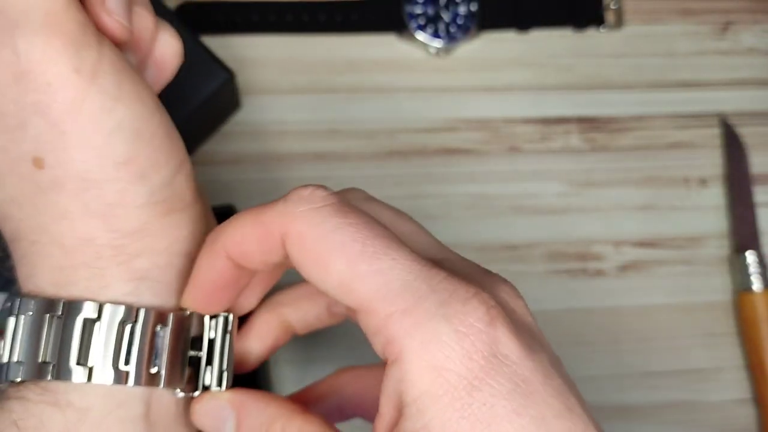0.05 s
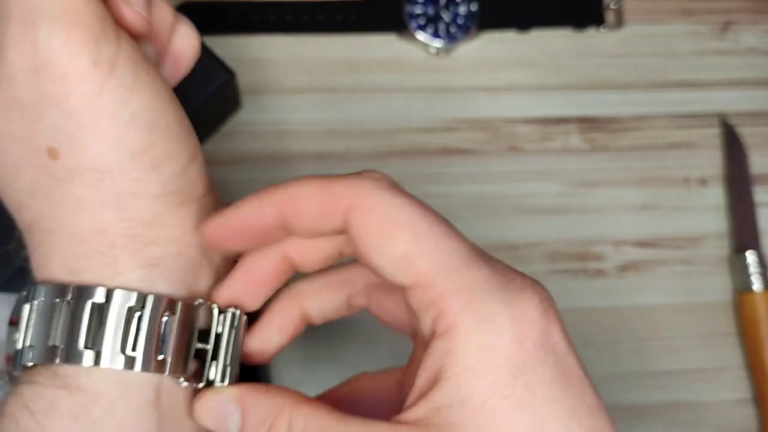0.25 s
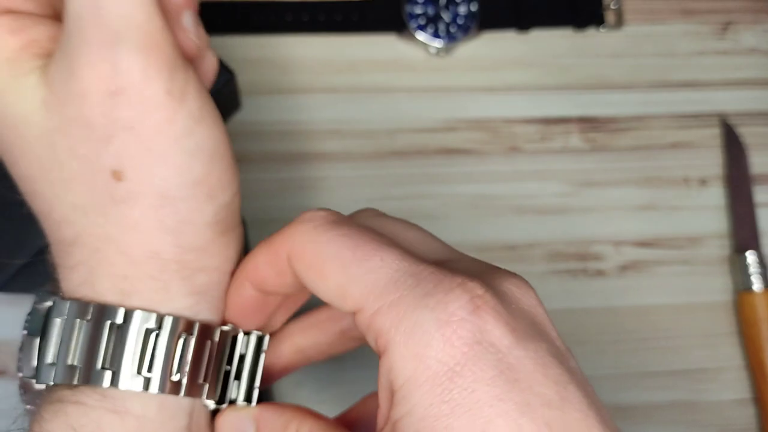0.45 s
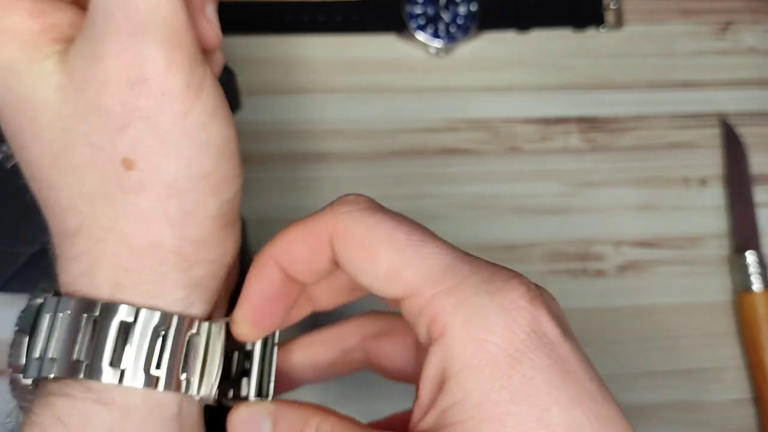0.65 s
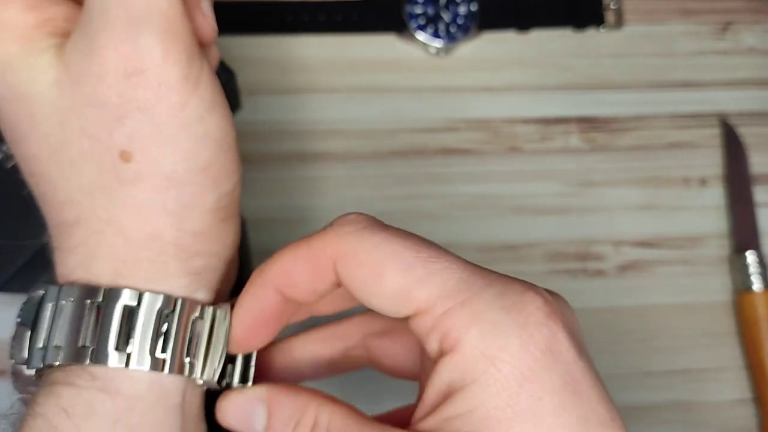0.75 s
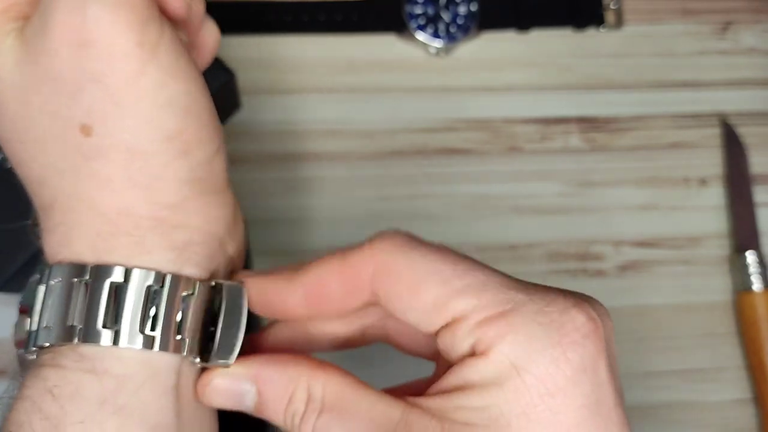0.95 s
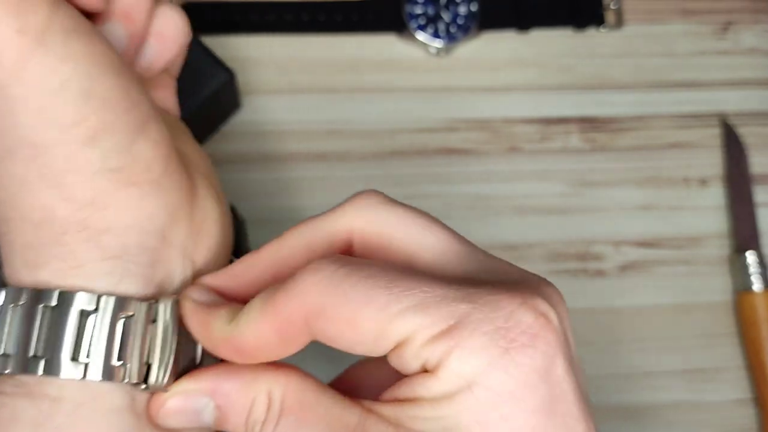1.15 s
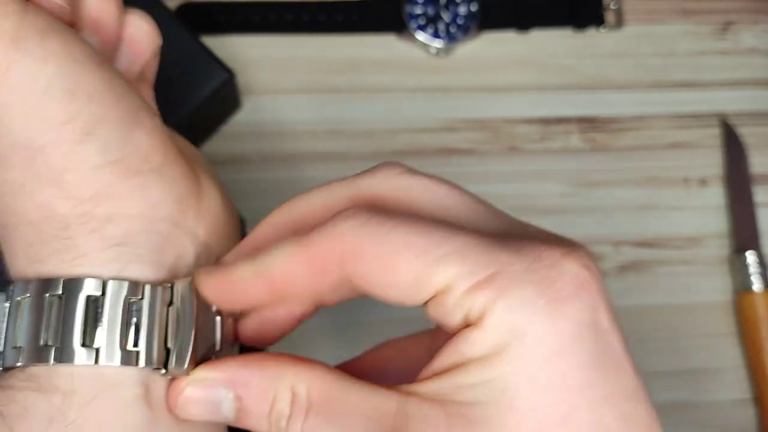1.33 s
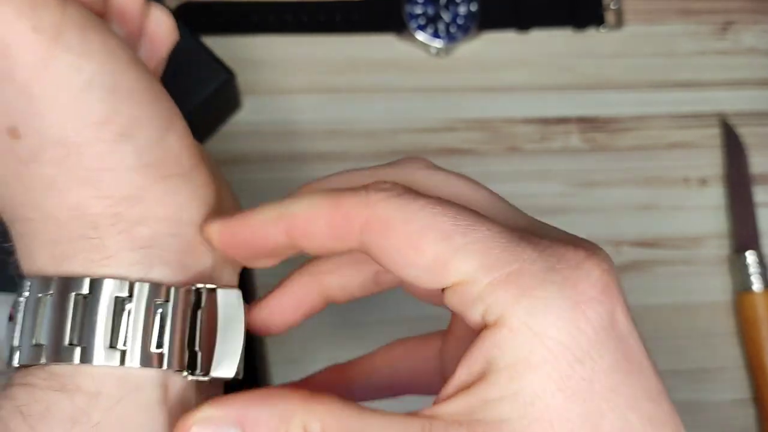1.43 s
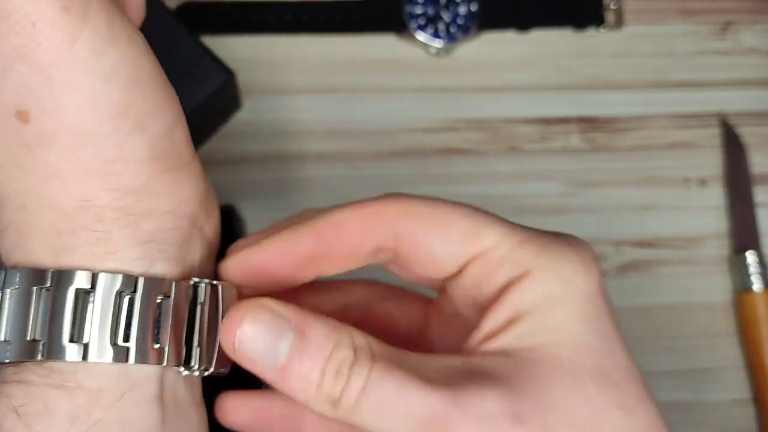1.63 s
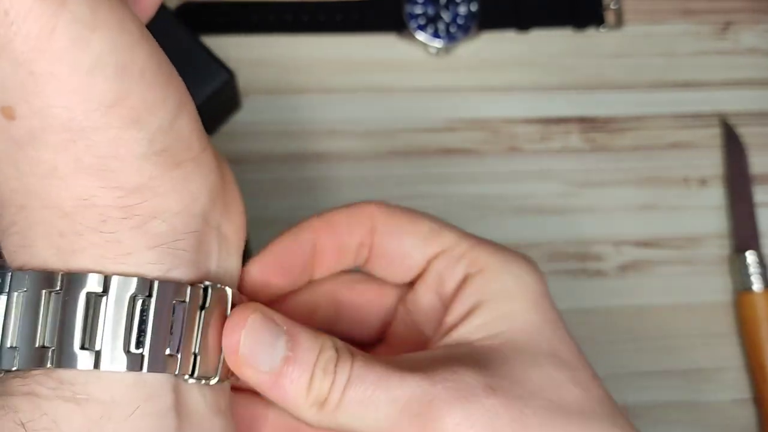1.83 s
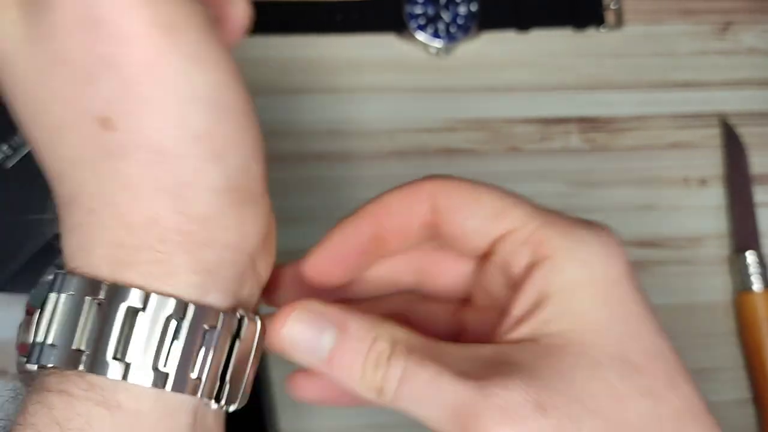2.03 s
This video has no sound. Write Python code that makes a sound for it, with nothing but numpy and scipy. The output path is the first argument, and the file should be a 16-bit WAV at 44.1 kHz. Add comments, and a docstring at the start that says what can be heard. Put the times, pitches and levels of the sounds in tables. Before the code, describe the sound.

A steel watch bracelet ticks and snaps shut in three bright metallic clicks, close in a quiet room

```python
"""Small quiet room: a steel watch bracelet is closed round a wrist, close to a pair of microphones.
Links tick as clusters of touches ring damped steel modes; rubs are dense grains, clear notes single modes.
The clasp snaps three times, with dull pushes on the wrist made as heavily damped swings, the strongest
at the last snap. Steel sounds return from the walls by convolution with decaying noise. Shaped noise
gives the dying tail of an earlier knock and a soft room hum and hiss."""
import sys
import numpy as np
from scipy import signal
from scipy.io import wavfile
from scipy.ndimage import uniform_filter1d

SR = 44100
rng = np.random.default_rng(int(sys.argv[2]) if len(sys.argv) > 2 else 0)


def inscribe(sig):
    """Save sig as 16-bit PCM at rate SR to the path in sys.argv[1].

    A 1-D sig is mono; a 2-D sig holds one channel per row.
    Samples are clipped to [-1, 1] before scaling.
    """
    pcm = np.round(np.clip(np.atleast_2d(sig).T, -1, 1) * 32767)
    wavfile.write(sys.argv[1], SR, pcm.astype(np.int16))


N = 92036

# Spreads from mode to mode and touch to touch; fade towards the ends of a cluster
DETUNE, STRENGTH_SPREAD_DB, TOUCH_SPREAD_DB, TOUCH_FADE_DB = .012, 2.5, 3, 6
CRACK_DB, CRACK_S = -7, 0.00029   # broadband edge of a touch against the ring's peak; 1/e decay time
LEAD_DB, AFTER_DB = -11.5, -14.5   # small touches before and after the main one, ahead of brightening
ROOM_RING = 0.34   # the steel's ring beside a unit impulse, in what goes out to the walls
PUSH_CYCLES, PUSH_LOW_HZ = 0.45, 82.5
RUB_GRAINS_PER_S, RUB_SPREAD_DB, RUB_OCTAVES = 2500, 4, 3.2
LEFT_LEAD_S = .00025
ECHO_S, ECHO_SPREAD_S, ECHO_DB = 0.01, 0.0014, -18   # early echoes: centre, width, energy
ROOM_DB, ROOM_RISE_S = -14.5, 0.037   # diffuse tail: energy, length of the ramp that ends at ECHO_S
KNOCK_DB, KNOCK_FLICKER_DB = -36.5, 2
AIR_DB, HUM_TOP_HZ, AIR_FLICKER_DB, AIR_PAN_DB = -58, 700, 2.27, 1
MIC_LOW_HZ, MIC_TOP_HZ, CUTOFF_HZ, FULL_SCALE = 50, 15700, 16950, .76


def from_db(db):
    """Logarithmic level: 20 dB is a factor of ten in amplitude."""
    return 10 ** (np.asarray(db) / 20)


def at_hz(points, hz):
    """Linear interpolation of a table on a log-frequency axis."""
    table_hz, values = np.array(points).T
    return np.interp(np.log(hz), np.log(table_hz), values)


def drift(rate):
    """Slow random modulation: normal draws, rate per second, joined by straight lines."""
    knots = rng.standard_normal(int(N / SR * 40) + 2)
    return np.interp(np.arange(N) / SR * rate, np.arange(len(knots)), knots)


def band_filter(order, edges, x):
    """Butterworth band-pass between two edges in Hz."""
    return signal.sosfilt(signal.butter(order, edges, "band", fs=SR, output="sos"), x)


def banded_noise(spectrum, shape_db):
    """Partly coherent half-octave noise: the mix of sum and difference sets left-right likeness.
    shape_db(hz) is a band's course in time; the rms is about 1 at shape 0."""
    # Coherence of the two microphones: f/Hz, correlation
    likeness = [(60, 0.54), (300, 0.55), (700, 0.062), (2000, 0.0091)]
    out, power = 0, 0
    edges = 30 * 2 ** np.arange(0, 9.3, .5)
    white = rng.standard_normal((2, 2, N))
    for k, (low, high) in enumerate(zip(edges, edges[1:])):
        mid, side = band_filter(2, [low, high], white[k % 2])   # neighbours use independent noise
        hz = np.sqrt(low * high)
        alike = np.clip(at_hz(likeness, hz), -1, 1)
        gain = from_db(at_hz(spectrum, hz))
        power += gain ** 2 * (high - low) * 4 / SR
        stereo = np.sqrt(1 + alike) * mid + np.sqrt(1 - alike) * side * [[1], [-1]]
        out = out + gain * from_db(shape_db(hz)) * stereo
    return out / np.sqrt(power)


def add(out, sound, s, pan_db):
    """Time and level difference place a near sound; it reaches the left microphone first."""
    for side, (sign, heard) in enumerate(zip((1, -1), sound * np.ones((2, 1)))):
        i = int((s + side * LEFT_LEAD_S) * SR)
        out[side, i:i + len(heard)] += from_db(sign * pan_db / 2) * heard


def ports(x):
    """Cavity resonance: the air in each microphone's sound port lifts one treble band."""
    # Port resonance, left then right: f/Hz, bandwidth/Hz, lift/dB
    port_modes = [(8690, 670, 12.5), (11000, 900, 16)]
    out = []
    for side, (hz, width, db) in zip(x * np.ones((2, 1)), port_modes):
        r = np.exp(-np.pi * width / SR)   # pole radius
        zeros = (1 - r * r) / 2 * np.array([1, 0, -1])
        poles = [1, -2 * r * np.cos(2 * np.pi * hz / SR), r * r]
        out.append(side + (from_db(db) - 1) * signal.lfilter(zeros, poles, side))
    return np.array(out)


def clicks():
    """Modal impact: one firm touch amid small ones rings the steel, each click tuned a little differently.
    Rows: left, right, and the smoother sum over all directions that goes out into the room."""
    # Modes of links and clasp, damped by the skin: f/Hz, bandwidth/Hz, relative level/dB
    steel_modes = [(2770, 900, -7.5), (3140, 420, -2), (4250, 410, -8.5), (4860, 350, 0.5),
                   (5500, 510, -1.5), (6410, 250, -1.5), (7780, 740, -2.5), (8900, 600, 0),
                   (9500, 490, -3.5), (10230, 300, 4.5), (11070, 543, 2), (11720, 330, 0),
                   (12770, 640, 2.5), (14430, 300, 2)]
    # Steel touches steel: t/s, lead-in/ms, run-out/ms, six band levels/dB, left minus right/dB
    tick_table = [(0.075, 2.1, 0.8, -66, -65, -56, -50, -51, -68, 9.5),
                  (0.1414, 0.35, 0.46, -54.5, -47.5, -65, -45.5, -37, -46, 6),
                  (0.2839, 2.7, 3, -57, -54, -64, -60.5, -59, -69, 9.5),
                  (0.298, 2.3, 0.54, -56, -57.0, -51, -55, -47.5, -64.0, -1),
                  (0.3768, 2.3, 3.2, -57, -57, -49.5, -55, -43.5, -59, 2.5),
                  (0.3815, 1.9, 0.83, -70, -62, -62, -60, -57, -53, 14),
                  (0.4108, 0.5, 2.5, -69, -68, -65, -62, -53, -58, -2),
                  (0.4177, 2.3, 0.59, -70.0, -75, -69, -59, -43, -70, 6),
                  (0.4614, 2.1, 1.5, -61, -61, -59, -58, -46, -65, 2),
                  (0.492, 1.9, 3.2, -61, -67.0, -72.0, -71, -53, -65.0, -6.0),
                  (0.498, 2.5, 0.74, -63.5, -61, -68, -60, -59, -68.0, 13),
                  (0.5059, 1.7, 1.5, -64, -67, -62, -46, -39, -48, -1),
                  (0.5208, 1.76, 3, -60, -53, -54.5, -53, -47.5, -57.5, 3),
                  (0.5573, 0.4, 0.21, -68, -63, -55, -51, -51.5, -60, 6.5),
                  (0.6664, 1.4, 0.59, -61, -57.0, -55, -58, -45, -53, 9),
                  (0.6962, 0.3, 2.5, -47, -38, -33, -17.5, -14.5, -23, 5.5),
                  (0.7714, 2.2, 1.8, -69, -63, -49, -47, -36, -52.0, 12),
                  (0.781, 0.3, 2.9, -62, -57, -56, -61, -38, -53, -8.5),
                  (0.7863, 2.5, 1.46, -58.5, -58, -46.5, -47, -34.5, -36, 8.5),
                  (0.932, 3.6, 2.6, -60, -56, -57, -60, -49, -64, 3),
                  (0.9457, 3.6, 1.05, -60, -53, -52, -51, -50, -51, 4),
                  (0.977, 4.4, 4, -64, -45.5, -53, -35.5, -36, -43, -3.5),
                  (1.0645, 1.6, 3, -60.5, -50.5, -45.5, -47.5, -42, -46, 2),
                  (1.1826, 3.7, 1, -58, -51, -60, -56, -53, -59, 6),
                  (1.2014, 2.93, 1.84, -25.5, -24.5, -22.5, -20.5, -17, -25.5, 2),
                  (1.204, 0.49, 1.9, -46, -41.5, -37, -23.5, -24.5, -29, 9),
                  (1.417, 1.4, 1.46, -59.5, -55, -78, -79, -74, -76, 3),
                  (1.4303, 0.37, 1.4, -52.5, -46.5, -43, -40, -37, -48, -1.0),
                  (1.4583, 2.4, 2.2, -70, -63, -60, -62, -66, -71, 6.5),
                  (1.515, 1.33, 1.4, -66, -52, -46, -39, -35, -38, 3),
                  (1.5705, 0.2, 1.29, -49.5, -43, -36, -28, -22, -30.5, -3),
                  (1.666, 1.6, 3.7, -65, -51.5, -52.5, -48, -49.0, -64.5, 7),
                  (1.6734, 3.6, 1.7, -58, -55.5, -64.0, -52, -48.5, -66, -3),
                  (1.7569, 0.22, 1.35, -44.5, -44.5, -43.5, -36, -34.5, -40, 2.5),
                  (1.7754, 0.6, 1.32, -45.5, -40, -47.5, -40, -37, -43, 2.5),
                  (1.7826, 0.13, 3.3, -49.5, -42, -49, -53, -49, -70, 0),
                  (1.8856, 0.66, 0.74, -74, -53.5, -58, -56.5, -62.0, -72, 4),
                  (1.9057, 0.8, 0.72, -67, -61, -58, -51, -48, -61, 1),
                  (1.9118, 0.42, 0.71, -44, -31, -41, -36.5, -30, -39, 6),
                  (1.9312, 0.28, 1.19, -22.5, -20.5, -18, -14.5, -10, -19, 1.5),
                  (1.9328, 0.4, 1.17, -26.5, -22.5, -20.5, -20.5, -10, -17.5, 0)]
    # Edges of the six bands: f/Hz
    band_edges = [2300, 3600, 5600, 7500, 9500, 12500, 16200]
    # Added left minus right level of each band: level/dB
    band_pan = [2.5, -1, 6.5, 5, -2, 0.5]
    out = np.zeros((3, N + SR))
    t, start = np.arange(768) / SR, 300   # the main touch falls on sample 300
    hz, width, db = np.transpose(steel_modes)
    for s, lead_ms, after_ms, *band_db, pan_db in tick_table:
        tune, strength = rng.standard_normal((2, len(hz)))
        when, size = rng.random((2, 24)), rng.standard_normal((2, 24))   # rows: before, after
        mode_hz = hz * (1 + DETUNE * tune)
        modes = np.exp(-np.pi * width[:, None] * t) * np.sin(2 * np.pi * mode_hz[:, None] * t)
        ring = from_db(db + STRENGTH_SPREAD_DB * strength) @ modes
        ring = ring / np.abs(ring).max()
        crack = from_db(CRACK_DB) * rng.standard_normal(len(t)) * np.exp(-t / CRACK_S)

        spans = np.array([[-lead_ms / 1000], [after_ms / 1000]])
        levels = np.array([[LEAD_DB], [AFTER_DB]]) + TOUCH_SPREAD_DB * size - TOUCH_FADE_DB * when
        places = np.clip(start + (when * spans * SR).astype(int), 0, len(t) - 1)
        touches = np.zeros(len(t))
        np.add.at(touches, places, np.sign(size) * from_db(levels))
        touches = np.diff(touches, prepend=0)   # light touches are brighter
        touches[start] += 1
        sound = ports(signal.fftconvolve(touches, ring + crack))
        outgoing = ROOM_RING * ring + (t == 0)

        for edge, level_db, lean_db in zip(zip(band_edges, band_edges[1:]), band_db, band_pan):
            part, spread = band_filter(3, edge, sound), band_filter(3, edge, outgoing)
            strongest = uniform_filter1d((part ** 2).mean(axis=0), size=130).max()   # over 3 ms
            part = from_db(level_db) * part / np.sqrt(2 * strongest)
            add(out, part, s - start / SR, pan_db + lean_db)
            i = int(s * SR)
            same_energy = np.sqrt((part ** 2).sum() / 2 / (spread ** 2).sum())
            out[2, i:i + len(t)] += spread * same_energy
    return out[:, :N]


def notes():
    """Lightly damped single modes: a freer part keeps ringing after some ticks as a dying sine."""
    # Clear notes: t/s, f/Hz, peak level/dB, T60/s, left minus right/dB
    note_table = [(0.9765, 4730, -39, 0.038, 2), (1.065, 9680, -36.5, 0.036, 10.5),
                  (1.2022, 4400, -37, 0.07, 3), (1.7824, 4390, -42, 0.04, 5), (1.912, 4240, -38, 0.024, 6),
                  (1.9292, 4800, -27, 0.012, 6), (1.9326, 11660, -18, .03, -10),
                  (1.9317, 11150, -24, 0.028, -6), (1.9305, 4250, -25, 0.026, 3),
                  (1.9316, 4870, -25.5, 0.021, 5.5)]
    out, t = np.zeros((2, N + SR)), np.arange(4096) / SR
    for s, hz, db, t60, pan_db in note_table:
        add(out, from_db(db - 60 / t60 * t) * np.sin(2 * np.pi * hz * t), s, pan_db)
    return out[:, :N]


def pushes():
    """Heavily damped oscillation: each push of the clasp is one strong swing, then a much weaker one back."""
    # Pushes on the wrist: t/s, envelope peak level/dB ahead of the high-pass, f/Hz, left minus right/dB
    push_table = [(0.6966, -32, 900, 12.5), (1.2021, -32, 810, 6.5), (1.9118, -36.5, 700, 5),
                  (1.931, -18, 292, 10)]
    out, t = np.zeros((2, N + SR)), np.arange(2048) / SR
    for s, db, hz, pan_db in push_table:
        x = t * hz * 2 / PUSH_CYCLES
        envelope = np.e ** 2 / 4 * (2 * x) ** 2 * np.exp(-2 * x)   # peaks at 1 where x = 1
        add(out, from_db(db) * envelope * np.sin(2 * np.pi * hz * t), s, pan_db)
    high_pass = signal.butter(1, PUSH_LOW_HZ, "high", fs=SR, output="sos")
    return signal.sosfilt(high_pass, out[:, :N])


def rubs():
    """Stick-slip friction as shot noise: dense tiny catches swell and fade in a broad bright band."""
    # Links rub over each other: t/s, length/s, rms level/dB at the middle, band centre f/Hz
    rub_table = [(0.276, 0.036, -61, 7800), (0.357, 0.049, -55, 9150), (0.645, 0.089, -52.5, 9050),
                 (0.751, 0.065, -50, 10100), (0.915, 0.062, -55, 7900), (1.166, 0.065, -54, 7800),
                 (0.692, 0.0068, -33, 9500), (1.922, 0.013, -28.5, 8360)]
    out = np.zeros((2, N + SR))
    for s, length, db, hz in rub_table:
        chance, sign, size = rng.random((3, 4000))
        count = int(length * SR)
        catches = (chance < RUB_GRAINS_PER_S / SR) * np.sign(sign - .5)
        grains = catches * from_db(-RUB_SPREAD_DB * np.log(size + 0.0082))   # few strong, many weak
        edges = np.clip(hz * 2 ** (RUB_OCTAVES / 2 * np.array([-1, 1])), 100, 19000)
        grains = band_filter(2, edges, ports(grains))
        add(out, from_db(db) * np.hanning(count) * grains[:, :count] / grains.std(), s, 0)
    return out[:, :N]


def room(x):
    """Reverberation by convolution: a bunch of early echoes within a diffuse tail that dies by band.
    The tail sounds at once, is full when the echoes peak, and is unlike at the two microphones."""
    # Decay of the room: f/Hz, T60/s
    decay = [(200, 0.51), (2000, 0.11), (5000, 0.21), (12000, 0.17)]
    # Colour of the tail: f/Hz, relative level/dB
    colour = [(200, -6), (2200, -4.5), (4200, 6.5), (8000, -9), (12000, -12.5), (15500, 1.5)]
    t, tail = np.arange(SR // 2) / SR, 0
    for low in 100 * 2. ** np.arange(0, 7.5, .5):
        hz = low * 2 ** .25
        noise = band_filter(2, [low, low * np.sqrt(2)], rng.standard_normal((2, len(t))))
        tail = tail + noise * from_db(at_hz(colour, hz) - 60 * t / at_hz(decay, hz))
    tail = ports(tail) * np.clip((t - ECHO_S) / ROOM_RISE_S + 1, 0, 1) ** 2
    tail = from_db(ROOM_DB) * tail / np.sqrt((tail ** 2).sum(axis=1, keepdims=True))
    echo = rng.standard_normal(tail.shape) * np.exp(-((t - ECHO_S) / ECHO_SPREAD_S) ** 2)
    tail += from_db(ECHO_DB) * echo / np.sqrt((echo ** 2).sum(axis=1, keepdims=True))
    return signal.fftconvolve(x[None], tail, axes=1)[:, :N]


def knock_tail():
    """Exponential decay by band: the room still sounds from an earlier knock, with two faint rings."""
    # Spectrum of the tail: f/Hz, relative density/dB per Hz
    knock_spectrum = [(35, -62), (60, -24.5), (350, -3), (651, -21), (1510, -17.5), (1700, -23.5),
                      (2300, -36), (3420, -19), (5090, -22.5), (8920, -34), (16000, -44)]
    # Its decay: f/Hz, T60/s
    knock_decay = [(150, 0.54), (400, 0.58), (1500, 0.38), (5000, 0.27), (12000, 0.34)]
    # Faint rings: f/Hz, peak level/dB, T60/s
    ring_table = [(930, -39, 0.098), (1654, -43, .4)]
    t = np.arange(N) / SR

    def course(hz):
        return -60 * t / at_hz(knock_decay, hz) + KNOCK_FLICKER_DB * drift(35)

    out = from_db(KNOCK_DB) * ports(banded_noise(knock_spectrum, course))
    for hz, db, t60 in ring_table:
        phase = rng.random((2, 1))   # in cycles, one for each microphone
        out = out + from_db(db - 60 * t / t60) * np.sin(2 * np.pi * (hz * t + phase))
    return out


def air():
    """Stationary noise with slow modulation: hum swells below, a lightly flickering hiss lies above."""
    # Spectrum of hum and hiss: f/Hz, relative density/dB per Hz
    air_spectrum = [(18, -54), (30, -17), (82, -5.5), (268, -2.5), (1060, -15.5), (1340, -14.5),
                    (3300, -25.5), (5160, -21.5), (8090, -35), (12000, -18), (15200, -45.5), (16500, -42)]
    # Swell of the low hum: t/s, level/dB (only the departure from the mean counts)
    hum_swell = [(0.2, -66), (0.44, -63), (0.706, -59), (1.063, -61.5), (1.556, -67), (1.854, -66.5),
                 (2.08, -62.5)]
    s, db = np.transpose(hum_swell)
    swell = np.interp(np.arange(N) / SR, s, db - db.mean())

    def course(hz):
        return swell / (1 + (hz / HUM_TOP_HZ) ** 2) + AIR_FLICKER_DB * drift(10.13)

    pan = from_db([[AIR_PAN_DB / 2], [-AIR_PAN_DB / 2]])
    return from_db(AIR_DB) * pan * banded_noise(air_spectrum, course)


def scene():
    """Superposition of near sounds, their room, and the background."""
    steel = clicks()
    light = rubs() + notes()
    near = steel[:2] + light + pushes()
    return near + room(steel[2] + light.mean(axis=0)) + knock_tail() + air()


def record(dry):
    """Band limits and clipping: deep bass and high treble are lost, peaks flatten, then the top is cut."""
    dry = signal.sosfilt(signal.butter(3, MIC_LOW_HZ, "high", fs=SR, output="sos"), dry)
    dry = signal.sosfilt(signal.butter(6, MIC_TOP_HZ, fs=SR, output="sos"), dry)
    clipped = np.clip(dry, -FULL_SCALE, FULL_SCALE)
    return signal.sosfilt(signal.cheby2(12, 70, CUTOFF_HZ, fs=SR, output="sos"), clipped)


dry = scene()
out = record(dry)
inscribe(out)
```